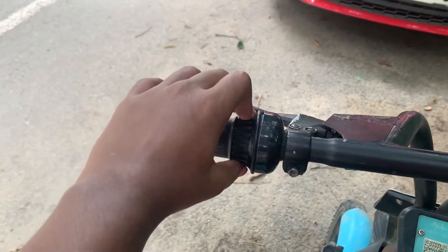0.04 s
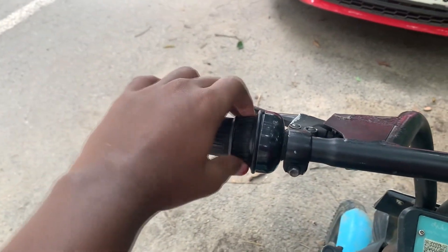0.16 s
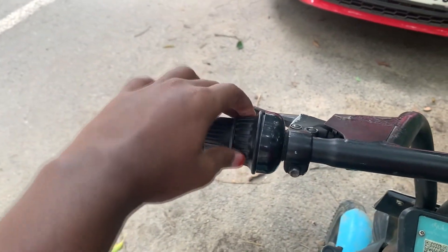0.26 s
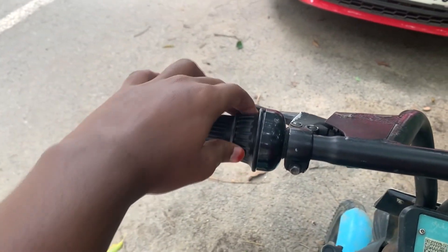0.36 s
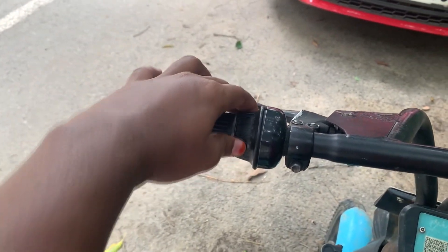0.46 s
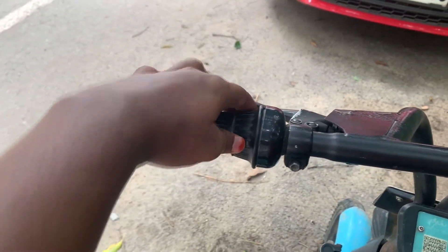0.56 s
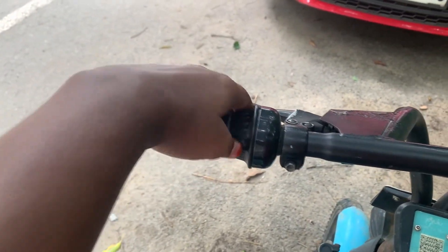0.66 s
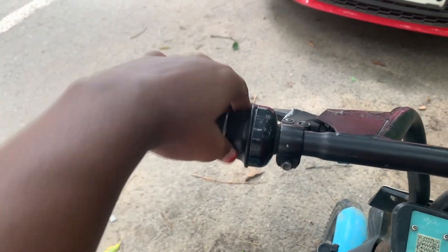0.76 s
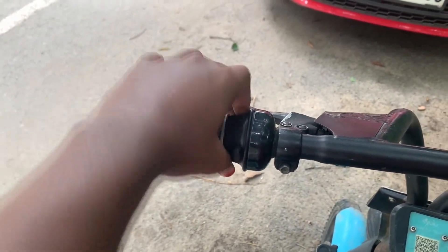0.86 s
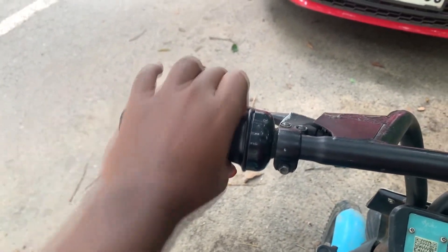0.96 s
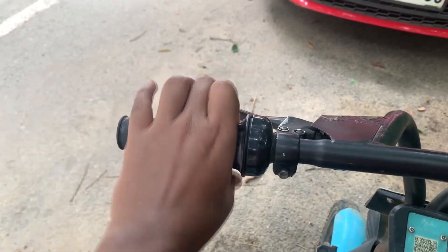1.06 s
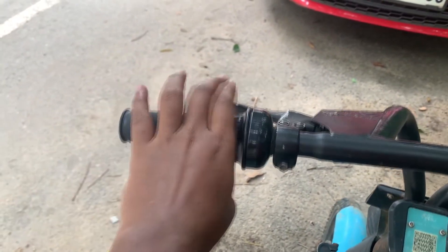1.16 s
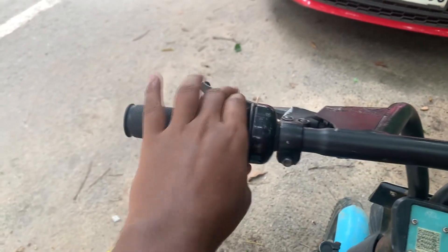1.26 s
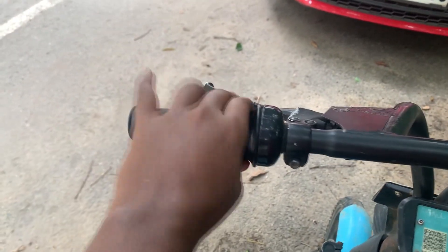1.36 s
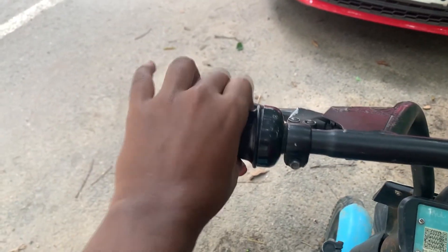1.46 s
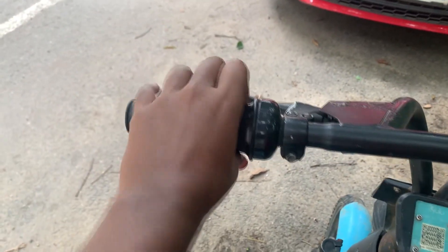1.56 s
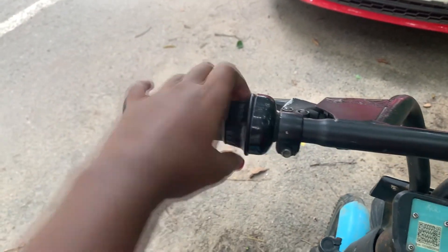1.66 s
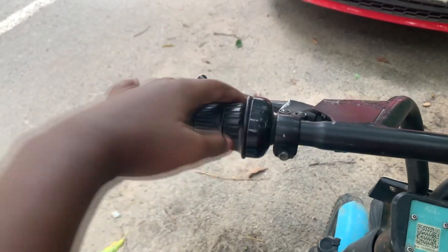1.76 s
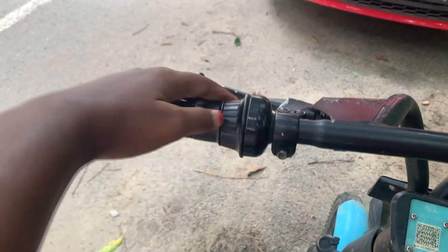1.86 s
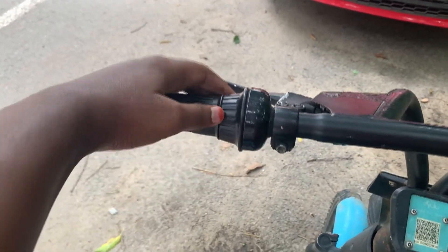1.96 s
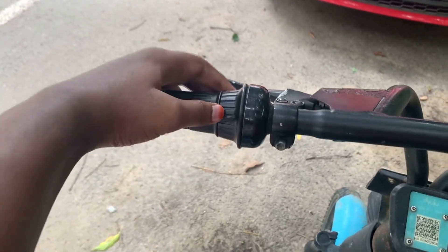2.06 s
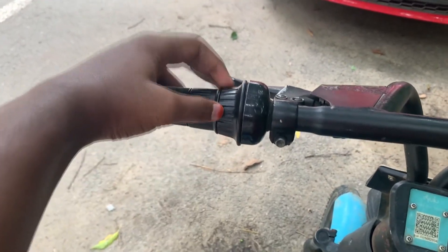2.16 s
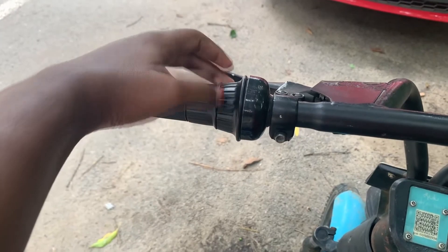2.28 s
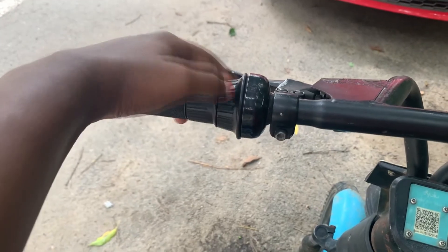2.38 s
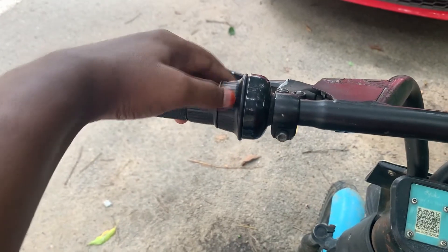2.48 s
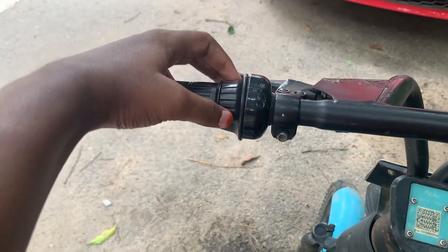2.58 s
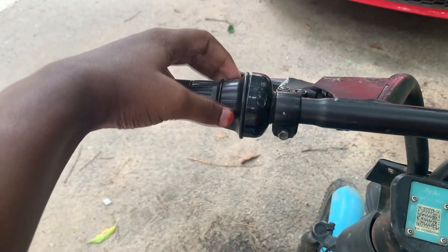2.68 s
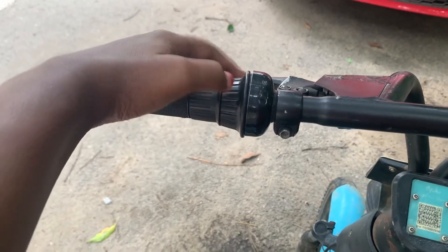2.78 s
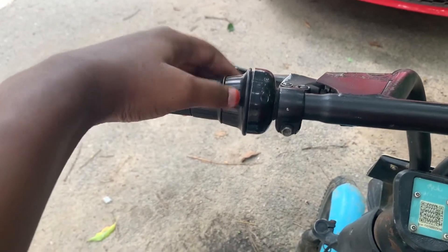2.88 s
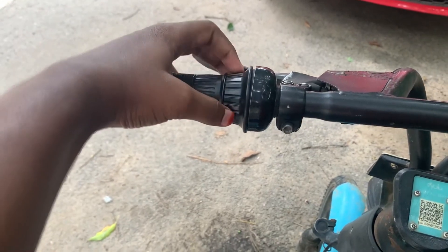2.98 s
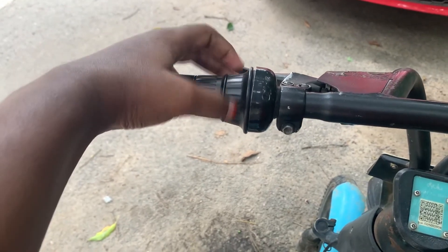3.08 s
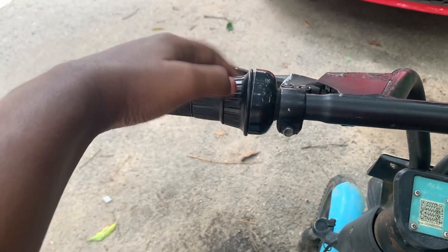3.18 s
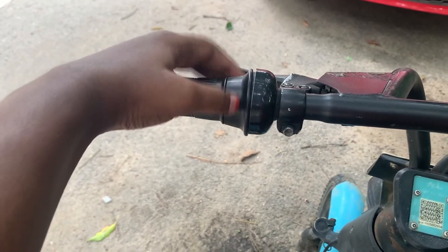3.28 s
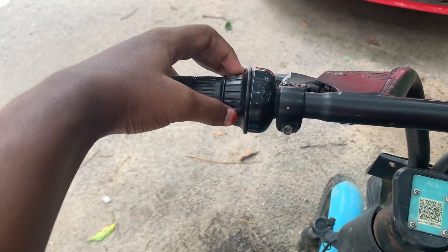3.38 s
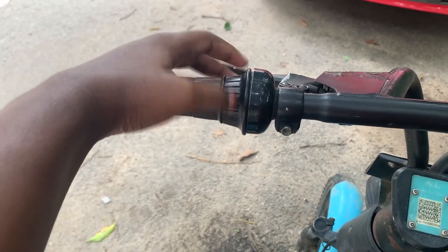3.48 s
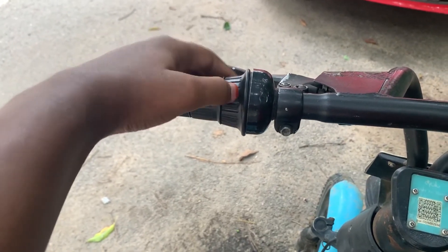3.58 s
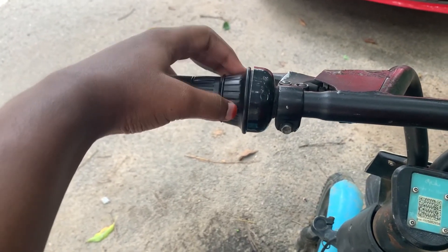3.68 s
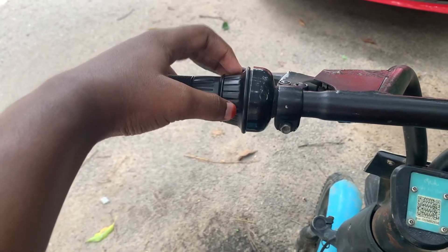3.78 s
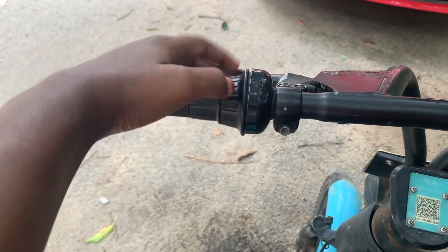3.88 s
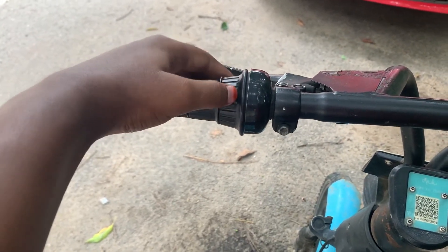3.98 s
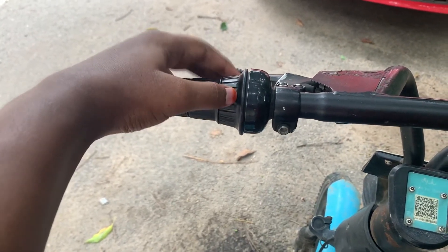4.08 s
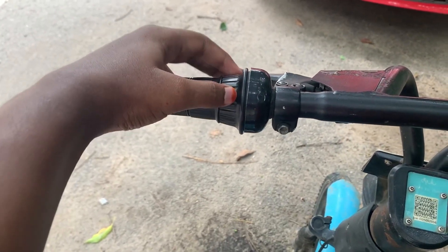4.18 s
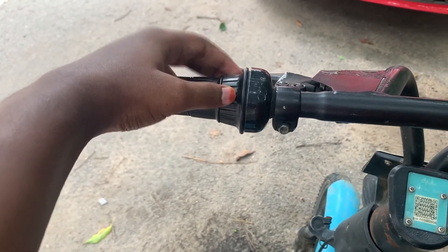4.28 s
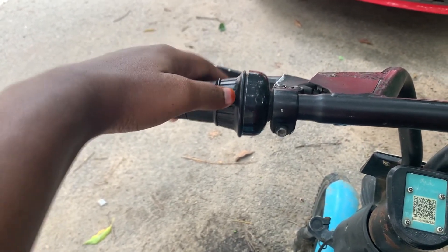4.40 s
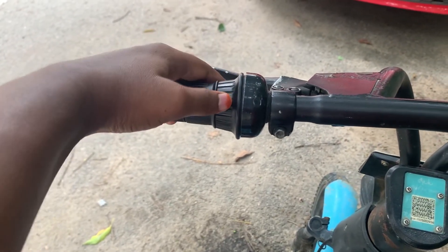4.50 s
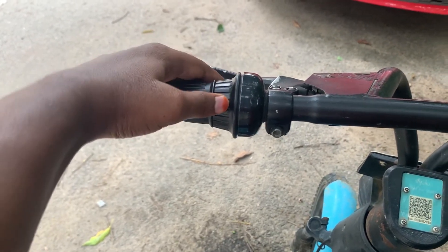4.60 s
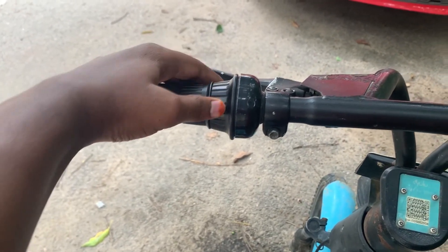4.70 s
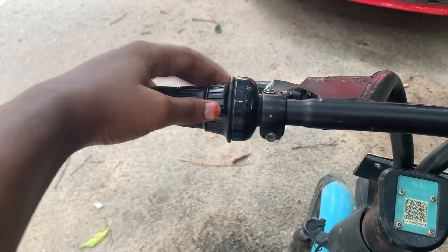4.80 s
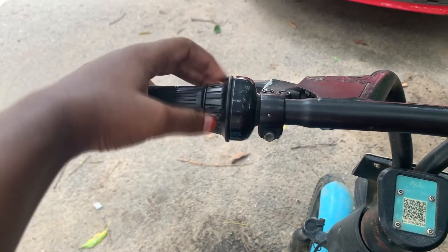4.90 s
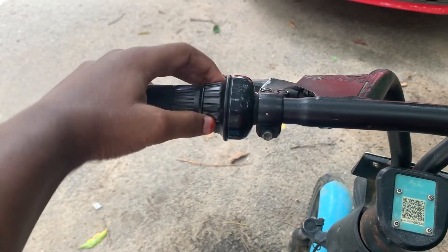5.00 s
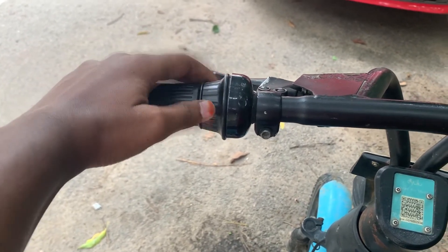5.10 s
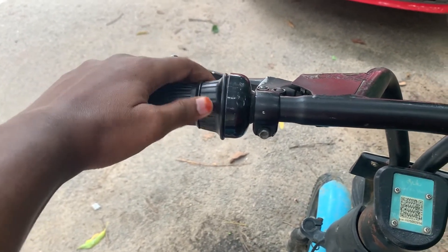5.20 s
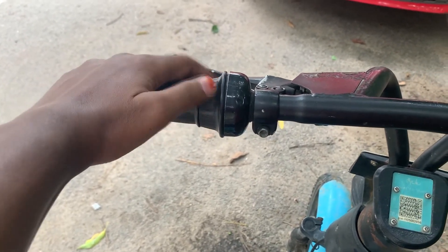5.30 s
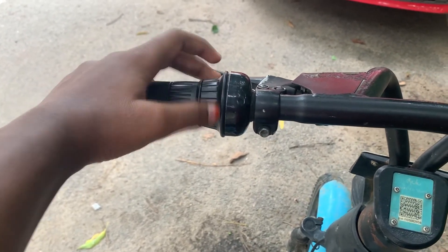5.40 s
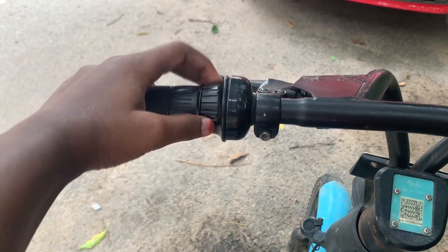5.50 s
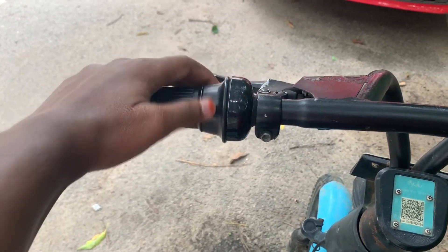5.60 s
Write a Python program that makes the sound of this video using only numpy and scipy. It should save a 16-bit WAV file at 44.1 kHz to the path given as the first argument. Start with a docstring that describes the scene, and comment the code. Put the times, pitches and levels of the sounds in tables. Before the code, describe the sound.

A loud ding is already fading as it begins; a hand rubs along the grip with a low rumble, then the ratchet ticks and the bell sounds in brief choked bursts. Later dings ring slightly longer, and two have a thin shimmering tail. Tiny squeaks, low distant traffic and regular chirping birds sit far behind the close stereo pickup outdoors.

```python
"""A twist bell on a bicycle handlebar, close by in a quiet yard: choked modal dings in short bursts.
At the start one twist is dying away; traffic noise and bird chirps (raspy falling tones) run throughout.
Early on the hand, lumpy coloured noise, rumbles along the grip and the plastic ratchet ticks.
Faint squeaks join after a second; the background level dips after twists, once for longer.
Fingers choke most dings; each blow rattles the plastic housing, noise bursts through resonators."""
import sys
import numpy as np
from scipy import signal
from scipy.fft import irfft
from scipy.io import wavfile

SR = 44100
rng = np.random.default_rng(int(sys.argv[2]) if len(sys.argv) > 2 else 0)


def inscribe(sig):
    """Save sig as 16-bit PCM at rate SR to the path in sys.argv[1].

    A 1-D sig is mono; a 2-D sig holds one channel per row.
    Samples are clipped to [-1, 1] before scaling.
    """
    pcm = np.round(np.clip(np.atleast_2d(sig).T, -1, 1) * 32767)
    wavfile.write(sys.argv[1], SR, pcm.astype(np.int16))


N = 249165
TIME = np.arange(N) / SR


def from_db(db):
    """Decibels to amplitude gain."""
    return 10 ** (np.asarray(db) / 20)


def rms_one(x):
    """Scale to unit rms."""
    return x / np.sqrt(np.mean(x ** 2) + 1e-20)


def fade(t, t60_s):
    """Exponential decay by 60 dB in t60_s."""
    return np.exp(-np.log(1000) * t / max(t60_s, 1e-3))


def add(out, start_s, sound):
    """Mix a sound in at start_s, cropped to the scene."""
    at = round(start_s * SR)
    sound = sound[..., max(-at, 0):N - at]
    out[..., max(at, 0):max(at, 0) + sound.shape[-1]] += sound


def at_hz(points, hz):
    """Read a table on a log-frequency axis."""
    point_hz, value = np.transpose(points)
    return np.interp(np.log(hz + 1), np.log(point_hz), value)


def drift(rate_hz):
    """Smooth random curve, rms 1, from rate_hz knots per second."""
    knots = rng.standard_normal(int(N / SR * rate_hz) + 2)
    return rms_one(np.interp(TIME * rate_hz, np.arange(len(knots)), knots))


def stereo(mid, side, alike):
    """Left and right with a given likeness (correlation, -1 to 1)."""
    alike = np.clip(alike, -1, 1)
    return np.sqrt(1 + alike) * mid + np.sqrt(1 - alike) * side * [[1], [-1]]


# bell twists, two blows each: (time [s], level [dB], gap to second blow [s],
# second blow re first [dB], first choked t60 of 7-13.5 kHz modes [s],
# choked modes below 7 kHz [dB], extra free ring of second blow as the fingers lift [dB])
TWISTS = [(-.1, 3.5, 0.016, 9.5, .025, -6.5, 4), (0.8583, -9.5, 0.022, -7.5, .028, 1.5, 0),
          (0.9608, -10, .0437, -2.5, .032, -4.5, -4), (1.483, -8.5, 0.03, -5.5, .025, -5, -0.5),
          (2.571, -13, 0.012, 2, .15, 4.5, 7.5), (2.966, -9.5, 0.014, -8, .12, -2.5, 31),
          (3.3511, -9.5, .0142, -6, .086, -2.5, -2), (3.705, -10.5, 0.011, -17.5, .05, -4, -1.5),
          (5.2706, -11.5, 0.015, -10, .09, 3, 2.5), (5.6095, -9, 0.0065, -10, .056, 3.5, 25)]
SECOND_T60_S = 0.086
FREE_RING_DB = -56.5  # what escapes the resting fingers, before the lift


def blows():
    """Each twist throws the clapper twice: rows (s, level dB, choked t60 s, low modes dB, free ring dB)."""
    rows = []
    for s, db, gap_s, again_db, first_t60_s, low_db, lift_db in TWISTS:
        rows.append((s, db, first_t60_s, low_db, FREE_RING_DB))
        rows.append((s + gap_s, db + again_db, SECOND_T60_S, low_db, FREE_RING_DB + lift_db))
    return rows


# dome modes: (frequency [Hz], struck level [dB], free ring level [dB], free t60 [s],
# nominal beat with twin mode [Hz], left re right [dB], left phase lead [rad])
DOME = [(1307.4, -33.5, -34.5, 1.4, 2.4, 9, 1), (3262, -24, -8.5, 0.71, 9.7, -1, -2.5),
        (5667, -17, -12.5, 1.05, 16, -5.5, 1.5), (7870, -29.5, -25.5, 0.32, 9, -6, 0),
        (8494, -9, -11, 0.27, 12, 0.5, -3), (11160, -23, -19, 0.41, 8, 5.5, -3),
        (11799, 2.5, -4.5, .5, 46, -0.5, 1.08), (14400, -41.5, -33.5, .3, 15, -2, 0),
        (15550, 0.5, -13, .4, 12, 0.5, 0.43), (15660, -19.5, -24.5, .45, 12, -6, 3.3)]
LOW_EDGE_HZ, TOP_EDGE_HZ = 7000, 13500
LOW_HOLD, TOP_T60_S = 1.287, 0.058  # choked decay: low modes' t60 ratio; top modes' t60
CHOKED_TWIN, FREE_TWIN = 0.1, 0.72  # twin mode amplitude re main
FINGERTIPS_FROM_S = 2  # whole hand grips until then, afterwards only the fingertips
SECOND_MODE_HAND_DB, SECOND_MODE_FINGERTIPS_DB = 10, -6.5


def dome(pressure_waver=0.83):
    """Each blow rings all modes; the fingers choke most of it, the rest rings on and beats."""
    out, t = np.zeros((2, N)), TIME[:int(0.7 * SR)]
    ears = np.array([[0.5], [-0.5]])
    strikes = blows()
    next_blows = [row[0] for row in strikes[1:]] + [np.inf]
    for (s, db, t60_s, low_db, free_db), next_s in zip(strikes, next_blows):
        second_db = SECOND_MODE_HAND_DB if s < FINGERTIPS_FROM_S else SECOND_MODE_FINGERTIPS_DB
        # the clapper stops the old vibration as it starts the new one
        onset = 1 - fade(t, 0.0028)
        contact = onset * fade(np.maximum(s + t - next_s, 0), 0.012)
        u = t[:np.flatnonzero(contact > 1e-5)[-1]]
        # wavering finger pressure makes the beats uneven
        pressure = 1 + pressure_waver * drift(20)[:len(u)]
        for k, (hz, struck_db, ring_db, ring_t60_s, beat_hz, pan_db, lead_rad) in enumerate(DOME):
            phase, twin_phase = rng.uniform(0, 2 * np.pi, 2)
            # low modes take their own level and hold out longer against the fingers
            low = hz < LOW_EDGE_HZ
            if hz > TOP_EDGE_HZ:
                choked_t60_s = TOP_T60_S
            else:
                choked_t60_s = t60_s * LOW_HOLD if low else t60_s
            choked = from_db(db + struck_db + low_db * low) * fade(u, choked_t60_s)
            free = from_db(ring_db + free_db) * fade(u, ring_t60_s)
            # the dome is not quite round, so each mode has a twin nearby
            beat = np.exp(-2j * np.pi * beat_hz * np.cumsum(pressure) / SR)
            choked_swing = choked * (1 + CHOKED_TWIN * beat) / (1 + CHOKED_TWIN)
            free_swing = free * (1 + FREE_TWIN * beat * np.exp(1j * twin_phase))
            # the second mode depends on where the hand lies
            strength = from_db(second_db * (k == 1))
            carrier = np.exp(1j * (2 * np.pi * hz * u + phase))
            wave = strength * contact[:len(u)] * (choked_swing + free_swing) * carrier
            # mode lobes reach the two microphones with different strength and phase
            add(out, s, (wave * from_db(ears * pan_db) * np.exp(1j * ears * lead_rad)).real)
    return out


def bursts(events, rise_t60_s, lead_db, lead_t60_s):
    """Force of each snap: a short scrape as the spring loads, then a quick decay."""
    level, t = np.zeros(N), TIME[:SR // 2]
    for s, db, t60_s in events:
        add(level, s, from_db(db) * fade(t, t60_s) * (1 - fade(t, rise_t60_s)))
        scrape = fade(t, lead_t60_s)[::-1]
        add(level, s - len(t) / SR, from_db(db + lead_db) * scrape)
    return level


# left-right likeness of the plastic parts: (frequency [Hz], correlation [-1 to 1])
NEAR_LIKENESS = [(150, 0.93), (600, 0.062), (2000, -0.24), (5000, -0.15), (12000, 0.93)]


def rattle(level, resonances, rough_db):
    """Plastic chatters in uneven micro-contacts, each ringing the resonances in its own way."""
    out = np.zeros((2, N))
    force = level * rms_one(from_db(rough_db * drift(900)))
    for hz, width_hz, db in resonances:
        mid, side = rng.standard_normal((2, N))
        contacts = stereo(mid, side, at_hz(NEAR_LIKENESS, hz))
        r = np.exp(-np.pi * width_hz / SR)
        poles = [1, -2 * r * np.cos(2 * np.pi * hz / SR), r * r]
        gain = from_db(db) * np.sqrt(1 - r * r) / 2
        out += gain * signal.lfilter([1, 0, -1], poles, force * contacts + 1e-18)
    return out


# plastic housing resonances: (frequency [Hz], width [Hz], relative level [dB])
HOUSING = [(170, 100, -13), (320, 150, -23), (823, 360, -16), (1313, 130, -14), (1575, 450, -7),
           (2246, 110, -14), (4000, 260, -8.5), (4745, 290, -8.5), (6200, 450, -6), (7710, 500, -7.5),
           (9990, 530, -3), (12300, 570, -8), (14900, 1100, -8.5)]
CLATTER_DB, CLATTER_T60_S = -17, 0.052  # level re the blow that shakes it


def clatter():
    """Each clapper blow shakes the housing into its resonances."""
    events = [(s, db, CLATTER_T60_S) for s, db, *_ in blows()]
    knocks = bursts(events, rise_t60_s=0.00056, lead_db=-5, lead_t60_s=0.02)
    return from_db(CLATTER_DB) * rattle(knocks, HOUSING, rough_db=6.0)


# ratchet ticks as the fingers shift: (time [s], level [dB], t60 [s])
TICKS = [(.2185, -35.5, .025), (.8345, -44, 0.097), (.851, -27, 0.056), (1.145, -47.5, 0.068),
         (1.275, -48.5, 0.014), (2.31, -60, 0.039), (2.762, -35.5, 0.016), (3.126, -44.5, .055),
         (5.1401, -15.5, 0.021), (5.3568, -45.5, 0.048)]
# ratchet pawl resonances: (frequency [Hz], width [Hz], relative level [dB])
PAWL = [(1300, 600, -13), (2320, 150, -12.5), (3540, 140, -8.5), (5770, 850, -4.5), (7160, 330, -3.5),
        (10300, 620, -11), (12800, 1500, -18.5)]
PAWL_LEAD_S, PAWL_DB, PAWL_T60_S = 0.017, -46, 0.025  # slip before every twist


def ratchet():
    """The pawl snaps and rings, both on its ticks and just before every twist."""
    slips = [(s - PAWL_LEAD_S, PAWL_DB, PAWL_T60_S) for s, *_ in TWISTS]
    snaps = bursts(slips + TICKS, rise_t60_s=0.002, lead_db=-31.5, lead_t60_s=0.053)
    return rattle(snaps, PAWL, rough_db=3.0)


# left-right likeness of grip and yard noise: (frequency [Hz], correlation [-1 to 1])
AIR_LIKENESS = [(100, 0.94), (250, 0.68), (500, 0.19), (1000, -0.016), (3000, -.1), (10000, 0.25)]


def noise(spectrum):
    """Stereo noise of a given colour, rms 1, shaped in the frequency domain."""
    hz = np.arange(N // 2 + 1) * SR / N
    mid, side = rng.standard_normal((2, len(hz))) + 1j * rng.standard_normal((2, len(hz)))
    both = stereo(mid, side, at_hz(AIR_LIKENESS, hz))
    return rms_one(irfft(both * from_db(at_hz(spectrum, hz)), N))


# hand sliding along the grip: (start [s], end [s], level before lumps [dB])
SLIDES = [(.23, 0.848, -37), (1.26, 1.46, -48), (1.704, 3.3, -56)]
SLIDE_RISE_DB_PER_S, SLIDE_FALL_DB_PER_S = 108.5, 326.5


def slides():
    """Rubbing level: each slide swells, holds and stops quickly."""
    level = np.zeros(N)
    for start_s, end_s, db in SLIDES:
        rise_db = SLIDE_RISE_DB_PER_S * np.maximum(start_s - TIME, 0)
        fall_db = SLIDE_FALL_DB_PER_S * np.maximum(TIME - end_s, 0)
        level += from_db(db - rise_db - fall_db)
    return level


# skin rubbing on the grip: (frequency [Hz], relative density [dB per Hz])
RUB = [(25, -11), (45, -2), (100, 1), (170, -10), (260, -14), (370, -15.5), (540, -23.5), (1230, -25),
       (4000, -33), (7000, -43), (11000, -50), (16000, -65)]


def hand():
    """Skin grips and slips, so the rumble comes in lumps."""
    lumps = from_db(2 * drift(70))
    return slides() * lumps * noise(RUB)


# grip squeaks and, third, a distant whistle:
# (time [s], length [s], nominal pitch [Hz], level before direct and wall gains [dB])
SQUEAKS = [(1.386, 0.11, 2312, -52.5), (2.124, 0.029, 2340, -55.5), (4.355, 0.23, 3475, -67.5),
           (5.203, 0.056, 2160, -55.5)]


def squeaks(waver=0.012, direct_db=-8):
    """Short wavering squeaks of the grip and one faint distant whistle, smeared by the walls."""
    out = np.zeros(N)
    for s, length_s, hz, db in SQUEAKS:
        swell = np.hanning(int(length_s * SR))
        pitch_hz = hz * (1 + waver * drift(300)[:len(swell)])
        add(out, s, from_db(db) * swell * np.sin(2 * np.pi * np.cumsum(pitch_hz) / SR))
    return from_db(direct_db) * out + walls(out, t60_s=0.47)


# chirps: (time [s], level before direct and wall gains [dB])
CHIRPS = [(0.214, -40), (0.801, -52), (1.336, -53.5), (1.835, -54), (2.415, -56), (3.108, -61.5),
          (3.642, -57), (4.205, -59), (4.771, -57.5), (5.3, -61)]
CHIRP_HZ = 5014  # every chirp starts here
BIRD_RASP = 0.038  # pitch roughness, share of CHIRP_HZ


def bird(length_s=0.1, fall=0.094, fall_s=0.029, octave_db=-15, direct_db=-6):
    """Thin raspy chirps that drop a little in pitch, mostly heard off the walls."""
    out, t = np.zeros(N), TIME[:int(length_s * SR)]
    for s, db in CHIRPS:
        bend = BIRD_RASP * drift(350)[:len(t)] - fall
        pitch_hz = CHIRP_HZ * (1 + (1 - np.exp(-t / fall_s)) * bend)
        phase = 2 * np.pi * np.cumsum(pitch_hz) / SR
        swell = np.sqrt(np.abs(np.sin(np.pi * t / length_s)))
        tone = np.sin(phase) + from_db(octave_db) * np.sin(2 * phase)
        add(out, s, from_db(db) * swell * tone)
    return from_db(direct_db) * out + walls(out, t60_s=0.67)


# distant traffic and open air: (frequency [Hz], relative density [dB per Hz])
YARD = [(25, -25), (45, 0), (65, 6), (105, 0.5), (150, -11), (200, -11), (290, -31), (450, -17.5),
        (900, -24), (1800, -26), (3000, -30), (4700, -32), (7000, -46), (10000, -51.5), (14000, -63)]
YARD_DB = -55  # rms before dips


def yard():
    """Steady noise of low, distant traffic and open air."""
    return from_db(YARD_DB) * noise(YARD)


DIP_DB, DIP_AFTER_S, DIP_WIDTH_S = 4.5, 0.18, 0.044  # after each twist
LONG_DIP_FROM_S, LONG_DIP_TO_S, LONG_DIP_EDGE_S, LONG_DIP_DB = 3.38, 4.12, 0.042, 8
BASS_EDGE_HZ, BASS_DIP_SHARE = 130, 0.54  # bass dips less than the rest


def dips(sound):
    """The level dips briefly at set times after each twist and stays low once for longer."""
    brief = sum(np.exp(-((TIME - s - DIP_AFTER_S) / DIP_WIDTH_S) ** 2) for s, *_ in TWISTS)
    inside_s = np.minimum(TIME - LONG_DIP_FROM_S, LONG_DIP_TO_S - TIME)
    long = np.clip(inside_s / LONG_DIP_EDGE_S, 0, 1)
    dip_db = -DIP_DB * brief - LONG_DIP_DB * long
    bass = signal.sosfiltfilt(signal.butter(2, BASS_EDGE_HZ, fs=SR, output="sos"), sound)
    return from_db(BASS_DIP_SHARE * dip_db) * bass + from_db(dip_db) * (sound - bass)


def walls(x, t60_s):
    """Diffuse reflections from the buildings around: decaying noise, different at each ear."""
    t = TIME[:SR]
    tail = rng.standard_normal((2, SR)) * fade(t, t60_s) * (1 - fade(t, 0.02))
    return signal.fftconvolve(np.atleast_2d(x), rms_one(tail) / np.sqrt(SR), axes=-1)[:, :N]


def scene(dome_db=3, wall_db=-28):
    """Bell and ratchet in front, the hand on the grip, the yard behind."""
    bell = from_db(dome_db) * dome() + clatter() + ratchet()
    reflections = from_db(wall_db) * walls(bell, t60_s=0.52)
    return bell + reflections + dips(hand() + yard()) + bird() + squeaks()


def record(dry, low_cut_hz=36, clip_level=0.92, cutoff_hz=16200):
    """The microphone drops the deepest bass, the highest peaks are clipped, the top is cut."""
    sound = signal.sosfilt(signal.butter(4, low_cut_hz, "high", fs=SR, output="sos"), dry)
    sound = np.clip(sound, -clip_level, clip_level)
    return signal.sosfilt(signal.butter(24, cutoff_hz, fs=SR, output="sos"), sound)


dry = scene()
out = record(dry)
inscribe(out)
```